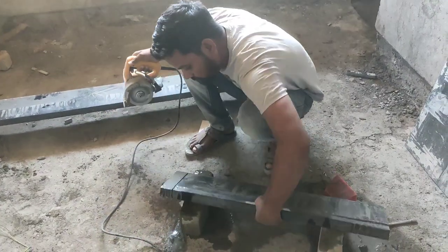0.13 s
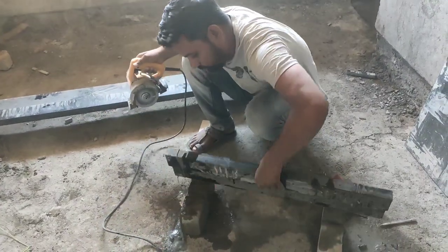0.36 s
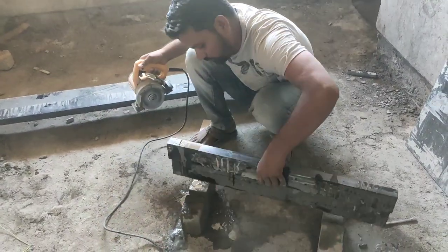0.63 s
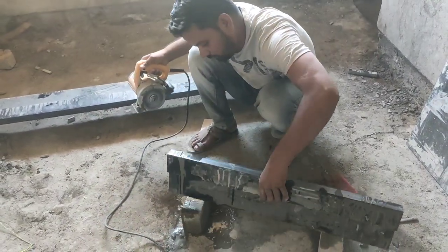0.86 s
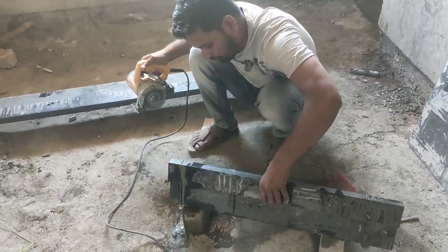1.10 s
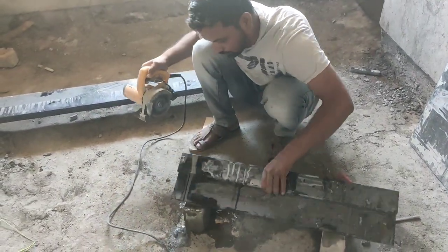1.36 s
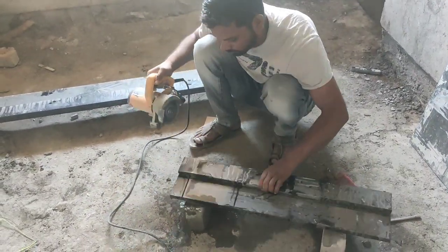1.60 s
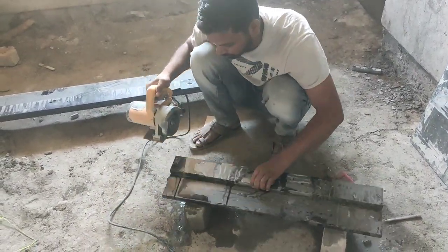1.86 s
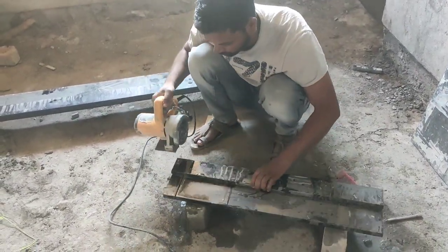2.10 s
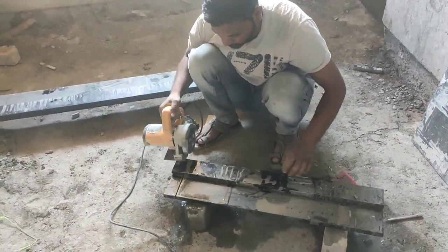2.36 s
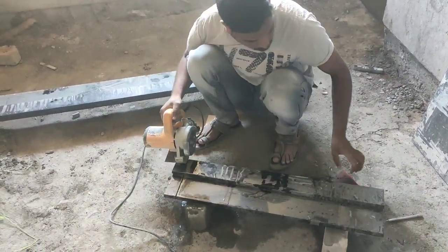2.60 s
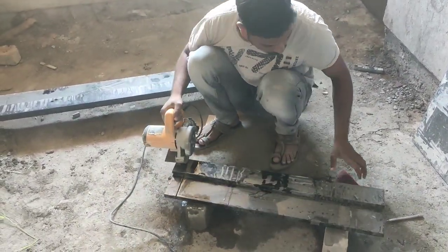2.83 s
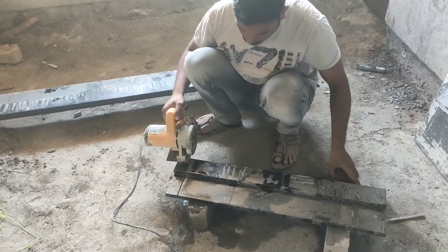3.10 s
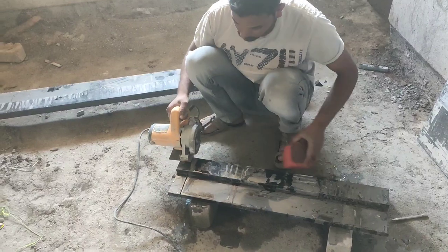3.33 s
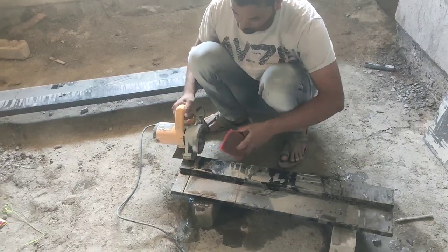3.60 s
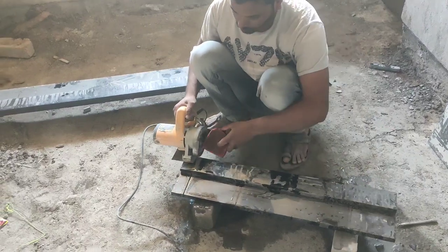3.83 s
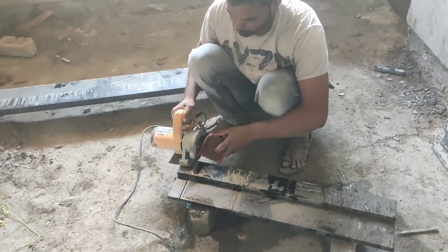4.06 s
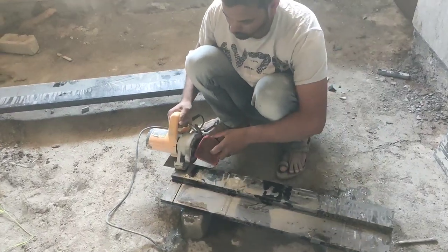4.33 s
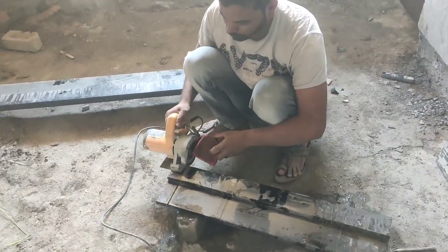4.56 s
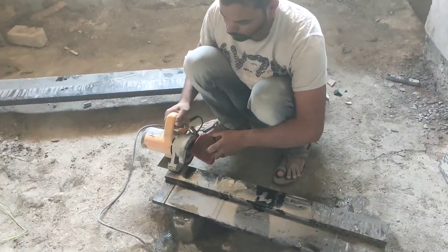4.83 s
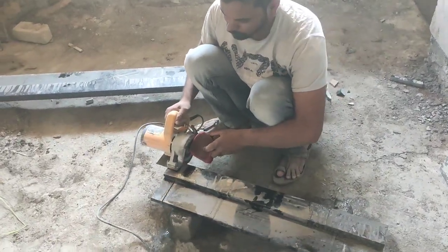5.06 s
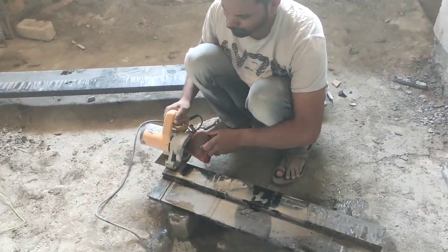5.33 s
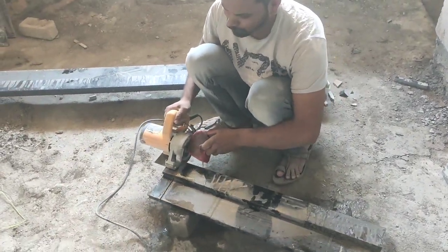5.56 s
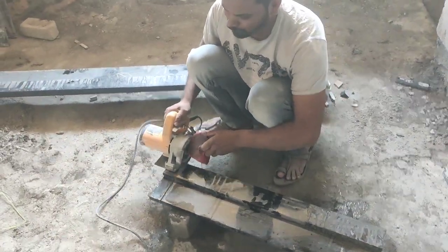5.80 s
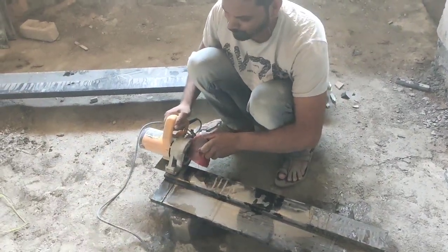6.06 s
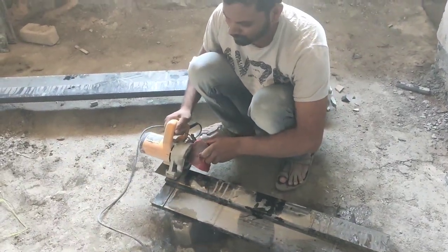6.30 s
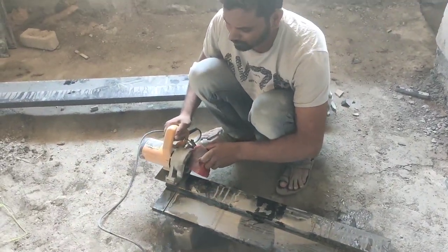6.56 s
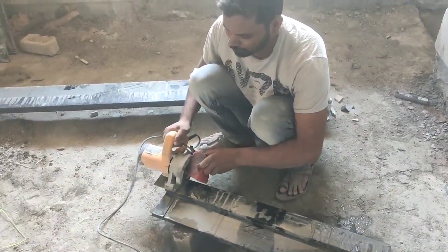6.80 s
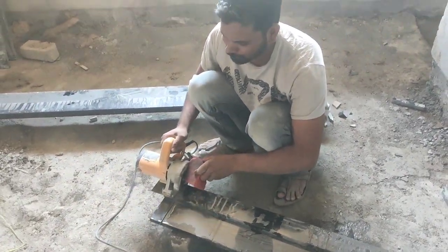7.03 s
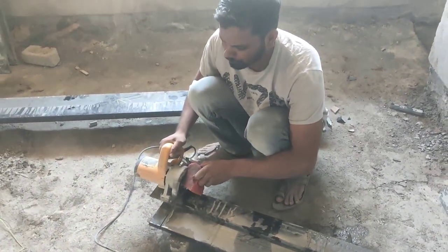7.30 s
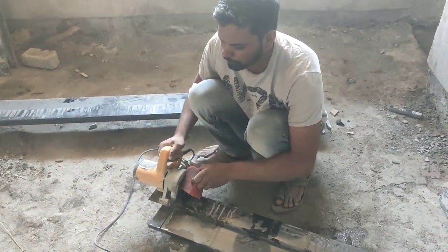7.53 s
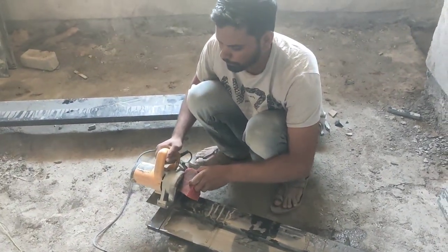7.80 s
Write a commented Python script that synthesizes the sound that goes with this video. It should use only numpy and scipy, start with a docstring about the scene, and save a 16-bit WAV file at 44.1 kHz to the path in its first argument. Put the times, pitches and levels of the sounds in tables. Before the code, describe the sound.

In a bare, hard-walled hall, a handheld electric cutter winds down, its airy roar and whine sinking while a stone slab is set down with soft knocks. Just before four seconds the switch clacks, the motor leaps to full speed, and the blade bites wet granite: a bright, gritty, ringing screech with hiss until the end. A phone listens a few steps away in stereo.

```python
"""Stone cutter in a bare hall

A handheld electric cutter coasts down, is switched on again and bites into wet granite.
The motor roars as noise coloured by its housing and whines in sines at multiples of the rotor speed.
Grains of grit ring the modes of the steel blade; rub and water spray hiss, blows knock, low bumps rumble.
A phone with two unlike microphones listens a few steps away.
"""
import sys
import numpy as np
from scipy import signal
from scipy.fft import rfft, irfft
from scipy.io import wavfile
from scipy.ndimage import uniform_filter1d

SR = 44100
rng = np.random.default_rng(int(sys.argv[2]) if len(sys.argv) > 2 else 0)


def int16_out(signal):
    """Quantize to a 16-bit WAV file."""
    q = np.round(np.clip(np.atleast_2d(signal).T, -1, 1) * 32767)
    wavfile.write(sys.argv[1], SR, q.astype(np.int16))


def volts_from_db(level):
    """Convert decibel levels to linear amplitude ratios."""
    exponent = np.asarray(level, float) / 20
    return 10 ** exponent


N = 348831
T = np.arange(N) / SR
HZ, FRAME_S = np.fft.rfftfreq(1024, 1 / SR), np.arange(N // 256 + 5) * 256 / SR  # grid of the hisses

SWITCH_S, FREE_HZ, RUN_UP_S = 3.76, 462, .17  # switched on, the rotor closes in on its free speed
START_HZ, FRICTION_HZ_PER_S, FAN_DRAG_S = 361, 19, 6.7  # coasting speed at 0 s and what slows it
GEAR = .43  # blade turns per rotor turn
TOUCH_S = 4.156  # the blade meets the stone

# The stone holds the rotor back: (t/s, loss of speed f/Hz)
STONE_LOAD = [(4.22, 0), (4.5, 41), (5.15, 46), (5.55, 36), (5.7, 39), (6.2, 34), (7.1, 40), (7.6, 26),
              (7.92, 24)]


def rotor(t):
    """Rotor speed in Hz: bearing friction brakes steadily, the fan more at speed; then run-up and load."""
    brake = FRICTION_HZ_PER_S * FAN_DRAG_S
    coast = (START_HZ + brake) * np.exp(-np.minimum(t, SWITCH_S) / FAN_DRAG_S) - brake
    run_up = 1 - np.exp(-np.maximum(t - SWITCH_S, 0) / RUN_UP_S)
    return coast + (FREE_HZ - coast) * run_up - curves(STONE_LOAD, t)[0]


# Roar spectrum at brightness 0: (f/Hz, relative level/dB per Hz)
DULL_ROAR = [(30, -52), (110, -33), (170, -21), (500, -13.5), (800, -10), (1300, -10), (1900, -6.5),
             (3000, -10), (4500, -17), (6200, -13), (7300, -23), (11500, -36.5), (16000, -33)]
# Roar spectrum at brightness 1: (f/Hz, relative level/dB per Hz)
BRIGHT_ROAR = [(18, -81), (30, -74), (233, -25), (303, -18), (486, -15), (822, -11), (962, -6.5),
               (1160, -8), (1320, -9), (1630, -8), (3310, 1.5), (4910, 5.5), (7470, -17.5), (11700, -20.5),
               (16000, -53)]
# Resonances of the casing, plainest while the roar is dull: (f/Hz, width f/Hz, lift before scaling level/dB)
CASING = [(780, 26, 12), (2100, 250, 4), (2620, 300, 3), (3950, 260, 8), (5650, 120, 3)]
# Roar under power, lower once the blade is in the stone: (t/s, level/dB, brightness 0-1)
POWERED_ROAR = [(3.763, -16, 0.8), (3.81, -15, 0.65), (3.95, -17, 0.42), (4.1, -14, 0.64),
                (4.44, -18, 0.54), (4.57, -22.5, 0.68), (5.75, -24, 0.65), (7.91, -23, 0.58)]
COAST_DB, COAST_DB_PER_OCTAVE = -19.5, 10.5  # coasting roar at START_HZ, without the afterglow
COAST_BRIGHT, COAST_BRIGHT_PER_OCTAVE = 0.45, 0.13  # brightness at START_HZ and its change with speed
AFTERGLOW_DB, AFTERGLOW_S = 1.5, 0.29  # louder roar from before the switch-off dies away in the hall
BASS_HZ, BASS_DB_PER_OCTAVE = 600, 2  # the bass fades faster as the rotor slows


def roar():
    """Fan air, gears and brushes: noise coloured by the casing, brighter at speed."""
    coasting = FRAME_S < SWITCH_S
    octaves = np.log2(rotor(FRAME_S) / START_HZ)
    coast_bright = COAST_BRIGHT + COAST_BRIGHT_PER_OCTAVE * octaves
    bright = np.clip(np.where(coasting, coast_bright, curves(POWERED_ROAR, FRAME_S)[1]), 0, 1.3)
    field_db = read(DULL_ROAR, HZ)[:, None] * (1 - bright) + read(BRIGHT_ROAR, HZ)[:, None] * bright
    bass_share = 1 / (1 + (HZ / BASS_HZ) ** 4)
    field_db += np.outer(bass_share, BASS_DB_PER_OCTAVE * (octaves + 0.51) * coasting)
    field_db += np.outer(lift(HZ, CASING), np.clip(1.5 - 2.2 * bright, 0, 1.1))
    air = hiss(field_db, patchy_db=1.5, flicker_db=.6, size=(3, 20))
    coast_db = COAST_DB + COAST_DB_PER_OCTAVE * np.log2(rotor(T) / START_HZ)
    coast_db += AFTERGLOW_DB * np.exp(-T / AFTERGLOW_S)
    return volts_from_db(np.where(T < POWERED_ROAR[0][0], coast_db, curves(POWERED_ROAR)[0])) * air


# Resonances that the coasting whine flares on in passing: (f/Hz, width f/Hz, lift level/dB)
FLARES = [(4150, 500, 6), (2640, 300, 11)]
# Whine under power: (t/s, level/dB before its trembling)
POWERED_WHINE = [(3.8, -44), (3.94, -32), (4.0, -22), (4.22, -23), (4.45, -25), (4.6, -32), (5.4, -23.5),
                 (6.6, -25), (6.95, -32), (7.92, -31)]
# Low resonances of the hall that lift the unbalance: (f/Hz, width f/Hz, lift level/dB)
HALL_RESONANCES = [(160, 7, 16), (224, 16, 19), (260, 10, 18), (316, 22, 23), (425, 8, 18)]
WHINE_DB, WHINE_DB_PER_OCTAVE = -44, 10  # coasting whine at START_HZ off the flares; fades with speed
OVERTONES, OVERTONE_DB = (24, 36), -47  # multiples of the rotor speed; level at the casing resonance
BELL_HZ, BELL_WIDTH_HZ = 5650, 500  # casing resonance that lets the overtones out
WOBBLE_DB = -76  # unbalance at the rotor speed itself, before the hall lifts it
BUZZ_DB, BUZZ_HZ, BUZZ_HOLD_S, BUZZ_FALL_DB_PER_S = -45, 300, .26, 85  # held, then falling
SPINDLE_DB, SPINDLE_SWELL_DB = -58, 3  # relative level of the spindle beat and its slow swell


def whine():
    """Sines locked to the rotor: slots at twelve times, overtones, unbalance; buzz and spindle beat."""
    hz, on = rotor(T), T - SWITCH_S
    # the speed and the strength tremble a little
    turns = 2 * np.pi * np.cumsum(hz * (1 + 0.00231 * wander(span=700))) / SR
    coast_db = WHINE_DB + WHINE_DB_PER_OCTAVE * np.log2(hz / START_HZ) + lift(12 * hz, FLARES)
    slots = volts_from_db(np.where(on < 0, coast_db, curves(POWERED_WHINE)[0])) * np.sin(12 * turns)
    for k in OVERTONES:
        bell = 1 / (1 + (2 * (k * hz - BELL_HZ) / BELL_WIDTH_HZ) ** 2)
        slots += volts_from_db(OVERTONE_DB) * bell * np.sin(k * turns)
    slots *= np.sqrt(2) * volts_from_db(2.5 * wander(span=1200))
    low = volts_from_db(WOBBLE_DB + lift(hz, HALL_RESONANCES) + 2.5 * wander(span=3000)) * np.sin(turns)
    # mains buzz of the field coils under the starting current
    buzz_db = BUZZ_DB - BUZZ_FALL_DB_PER_S * np.maximum(on - BUZZ_HOLD_S, 0) + 3.1 * wander(span=600)
    low += np.clip(on / .02, 0, 1) * volts_from_db(buzz_db) * np.sin(2 * np.pi * BUZZ_HZ * T)
    # the blade spindle beats in the cut, at its turning rate and twice that
    beat = sum(resonate(rng.standard_normal(N), k * GEAR * hz, 22) for k in (1, 2))
    in_cut = np.clip((T - TOUCH_S) / 0.045, 0, 1)
    low += in_cut * volts_from_db(SPINDLE_DB + SPINDLE_SWELL_DB * wander(span=9000)) * beat
    return hall(slots, t60=.3, wet_db=-9, lag_count=1) + np.sqrt(2) * low


# Blade modes, shifting as the stone grips more of the rim:
# (shallow f/Hz, shallow relative level/dB, deep f/Hz, deep relative level/dB, width f/Hz)
BLADE_MODES = [(1970, -17, 1900, -28, 90), (2500, -22, 2580, -15, 70), (3090, -18, 2770, -13, 80),
               (2900, -22, 2960, -16, 70), (3400, -20, 3360, -12, 90), (3875, -2.5, 4000, -12, 90),
               (4310, -8, 4250, -11, 140), (4950, -5, 4720, -12, 130), (5190, -4, 5250, -9, 160),
               (6720, -12, 6600, -13, 140), (7070, -12, 7050, -18, 120), (8130, -14, 8240, -13, 240),
               (8510, -20, 8500, -23, 200), (9510, -25, 9580, -24, 250), (10150, -16, 10300, -16, 170),
               (11800, -26, 12000, -25, 280), (12400, -25, 12650, -24, 450), (13800, -28, 13900, -26, 400)]
# Depth of the cut: (t/s, depth 0-1)
CUT_DEPTH = [(4.3, 0), (4.9, .1), (5.3, .75), (6.3, .9), (7.92, 1)]
# The higher mode that sings out: (t/s, f/Hz, level/dB before the push)
SCREECH_MODE = [(4.24, 6490, -20.5), (4.4, 6290, -21), (4.7, 6290, -21), (4.95, 6150, -23.5),
                (5.7, 6360, -19), (6.4, 6265, -23.5), (7.0, 6266, -22), (7.91, 6290, -24.5)]
# The lower mode that sings out: (t/s, f/Hz, level/dB before the push)
GROAN_MODE = [(5.55, 2250, -34), (5.85, 2410, -32), (6.2, 2370, -27), (6.45, 2355, -31), (6.6, 2350, -27),
              (6.95, 2320, -29), (7.1, 2300, -37), (7.35, 2270, -29), (7.91, 2245, -30)]
# The hand pushes harder (+) or eases off (-): (t/s, change of level/dB, length t/s)
HAND_PUSHES = [(4.278, 1, .06), (4.36, -3, 0.088), (4.445, 2, 0.04), (4.597, -6, 0.068),
               (4.675, 0.5, 0.072), (4.83, -3, 0.044), (5.743, 2, 0.16), (5.816, -3.5, 0.05),
               (6.246, 1, 0.21), (6.363, -5, .08), (6.56, 2, 0.081), (6.79, 0, .05), (7.26, -0.5, 0.04)]
# Spectrum of the rub: (f/Hz, relative level/dB per Hz)
RUB_SPECTRUM = [(500, -62), (1500, -42), (2100, -8.5), (2500, -9.5), (2900, -29), (3150, -25), (3500, -3),
                (4000, 0), (5000, -3.5), (5650, -1.5), (6300, 0), (7400, -13.5), (9000, -51)]
# Spectrum of the water spray: (f/Hz, relative level/dB per Hz)
SPRAY_SPECTRUM = [(4000, -60), (6500, 16), (7500, 10), (8250, 4.5), (9050, 7), (10300, 5), (12500, 7.5),
                  (13400, -4), (15500, 9), (16000, -38)]
# Spray hiss: (t/s, level/dB before the push)
SPRAY_HISS = [(4.2, -19), (4.5, -34), (5.2, -31), (6.05, -27), (6.5, -27.5), (7.3, -28), (7.7, -26),
              (7.91, -30)]
TOUCH_RISE_S, GRIT_DB = 0.33, -14.5  # fade-in at the touch; base level that ring and rub follow
RING_DB, RUB_DB = -2.5, -4.5  # blade ring and rub against the grit level
SPRAY_SHARE, SCREECH_SHARE = 1.2, 1.7  # how strongly each follows the push


def grinding():
    """Dense grains of uneven size strike the blade; the rub and the water spray hiss around it."""
    push_db = sum(db * np.exp(-(2 * (T - s) / length) ** 2) for s, db, length in HAND_PUSHES)
    grit_db = GRIT_DB + push_db
    spray_db = curves(SPRAY_HISS)[0] + SPRAY_SHARE * push_db
    depth, touch = curves(CUT_DEPTH)[0], np.clip((T - TOUCH_S) / TOUCH_RISE_S, 0, 1)
    grains = rng.standard_normal(N) * volts_from_db(1.6 * wander(span=120) + 1.0 * wander(span=1500))
    waver = 1 + .004 * wander(span=5000)  # all blade modes waver slowly together in pitch, by chance
    modes = np.zeros(N)
    for hz0, db0, hz1, db1, width in BLADE_MODES:
        mode_db = db0 + (db1 - db0) * depth + 1.5 * wander(span=4000)
        modes += volts_from_db(mode_db) * resonate(grains, waver * (hz0 + (hz1 - hz0) * depth), width)
    ring = touch * volts_from_db(grit_db + RING_DB) * evened(modes)
    for rows, width, share in ((SCREECH_MODE, 130, SCREECH_SHARE), (GROAN_MODE, 70, 1)):
        hz, db = curves(rows)
        fade_in = np.clip((T - rows[0][0]) / 0.034, 0, 1)
        ring += volts_from_db(db + share * push_db) * fade_in * resonate(grains, waver * hz, width)
    steady = np.ones(len(FRAME_S))
    # the many lesser modes of disc and slab: narrow bands that swell and die over a few tenths of a second
    rub_field = np.outer(read(RUB_SPECTRUM, HZ), steady)
    rub = volts_from_db(grit_db + RUB_DB) * hiss(rub_field, patchy_db=4.2, flicker_db=1.0, size=(2, 90))
    spray_field = np.outer(read(SPRAY_SPECTRUM, HZ), steady)
    spray = volts_from_db(spray_db) * hiss(spray_field, patchy_db=3.5, flicker_db=1.2, size=(3, 50))
    return hall(ring, t60=.3, wet_db=1.5) + touch * (rub + spray)


# Stone set down and the jolt of the switch: (t/s, relative level/dB, thud f/Hz, decay by 60 dB t/s)
BLOWS = [(.05, -19.5, 656, 0.15), (.527, -30, 325, 0.15), (1.063, -32, 552, 0.19), (1.13, -26, 353, 0.041),
         (1.72, -33, 673, 0.17), (2.12, -26, 589, .15), (3.763, -14, 5620, 0.069),
         (3.79, -10.5, 2780, 0.088)]


def knocks():
    """Each blow is a short dying tone with a close partner and a puff of noise."""
    out, t = np.zeros(N), T[:12000]
    for s, db, hz, t60 in BLOWS:
        tone = np.sin(2 * np.pi * hz * t) + 0.51 * np.sin(2 * np.pi * 1.12 * hz * t)
        puff = 0.53 * rng.standard_normal(len(t)) * volts_from_db(-60 * t / 0.035)
        attack = np.minimum(t / 0.0019, 1)
        out[round(s * SR):][:len(t)] += volts_from_db(db - 60 * t / t60) * (tone + puff) * attack
    out = signal.sosfilt(signal.butter(2, 200, "high", fs=SR, output="sos"), out)
    return hall(out, t60=0.45, wet_db=-5.5)


# Low bumps, nearly all in the right microphone: (t/s, level/dB before the microphone gains, length t/s)
LOW_BUMPS = [(.2, -54, .3), (.7, -54, .4), (1.15, -55, .15), (4.52, -52, .05), (5.38, -42, .04),
             (5.45, -35, .05), (5.55, -48, .1), (5.73, -33, .04), (5.79, -40, .05), (5.88, -48, .1),
             (6.1, -48, .05)]
DRAUGHT_DB = -73  # steady rumble under the bumps, before the microphone gains


def bumps():
    """Lumpy rumble, mostly under 100 Hz, as from a draught or the holding hand."""
    noise = uniform_filter1d(rng.standard_normal(N), size=60)
    lumps = evened(signal.sosfilt(signal.butter(1, 45, fs=SR, output="sos"), noise))
    swell = volts_from_db(DRAUGHT_DB) + sum(volts_from_db(db) * np.exp(-(2 * (T - s) / length) ** 2)
                                  for s, db, length in LOW_BUMPS)
    return np.outer([.1, 1.9], swell * lumps)  # left and right gain


def evened(x):
    """Scales to rms 1."""
    return x / np.sqrt(np.mean(x ** 2) + 1e-20)


def read(points, hz):
    """A spectrum table read on a log-frequency axis."""
    f, value = np.transpose(points)
    return np.interp(np.log(hz + 1), np.log(f + 1), value)


def curves(rows, t=T):
    """The columns of a table read at the times t."""
    s, *columns = np.transpose(rows)
    return [np.interp(t, s, c) for c in columns]


def lift(hz, peaks):
    """Gain in dB of a few broad resonances at the frequencies hz."""
    return 10 * np.log10(1 + sum((volts_from_db(db) ** 2 - 1) / (1 + (2 * (hz - f) / width) ** 2)
                                 for f, width, db in peaks))


def resonate(x, hz, width):
    """Shifts the curve hz down to zero, smooths twice for steep skirts and shifts back; rms 1."""
    turn, r = np.exp(2j * np.pi * np.cumsum(hz) / SR), np.exp(-np.pi * width / SR)
    smooth = signal.lfilter([(1 - r) ** 2], [1, -2 * r, r ** 2], x / turn)
    return evened((turn * smooth).real)


def wander(span):
    """Slow chance of rms 1 that changes over span samples."""
    return evened(uniform_filter1d(uniform_filter1d(rng.standard_normal(N), span), span))


# Left-right likeness of every hiss: (f/Hz, correlation -1 to 1)
LIKENESS = [(60, 0.45), (180, 1), (550, 0.75), (1650, -0.09), (4970, -0.054), (15000, 0.12)]


def hiss(field_db, patchy_db, flicker_db, size=(12, 8)):
    """Noise of rms 1 in two channels from random short-time spectra, in patches of size (bins, frames)."""
    a, b, c, d, patches = rng.standard_normal((len(FRAME_S), 513, 5)).T
    patches = uniform_filter1d(patches, size=size[0], axis=0)
    patches = evened(uniform_filter1d(patches, size=size[1], axis=1))
    flicker = evened(uniform_filter1d(rng.standard_normal(len(FRAME_S)), size=3))
    same, left = np.clip(read(LIKENESS, HZ), -1, 1)[:, None], a + 1j * b
    right = same * left + np.sqrt(1 - same ** 2) * (c + 1j * d)
    # every frame gets the same power before patches and flicker
    shape = volts_from_db(field_db) / np.sqrt(np.mean(volts_from_db(field_db) ** 2, axis=0))
    z = np.array([left, right]) * shape * volts_from_db(patchy_db * patches + flicker_db * flicker)
    return evened(signal.istft(z, nperseg=1024, noverlap=768)[1][:, :N])


def hall(x, t60, wet_db, lag_count=15):
    """The direct sound, earlier on the right, plus a tail of sparse taps that differ by microphone."""
    signs = rng.choice([-1., 1.], (2, 16000))
    taps = signs * (rng.random((2, 16000)) < .06) * volts_from_db(-60 * T[:16000] / t60)
    taps[:, :150] = 0  # a gap before the tail
    taps *= volts_from_db(wet_db) / np.linalg.norm(taps[0])
    taps[0, lag_count] = taps[1, 0] = 1
    return signal.oaconvolve(x[None], taps / np.linalg.norm(taps[0]), axes=1)[:, :N]


def lean(x, points):
    """Shares the level between the microphones by frequency."""
    db = read(points, np.fft.rfftfreq(N, 1 / SR)) / 2
    return irfft(rfft(x) * volts_from_db(np.array([db, -db])), N)


# How motor and knocks lean to one microphone: (f/Hz, left minus right level/dB)
MOTOR_LEAN = [(60, 22), (110, 7), (200, 1), (380, 1), (700, 0.5), (1290, 1), (2380, 5), (4400, 7),
              (8120, -3.5), (15000, -8)]
# How the grinding leans to one microphone: (f/Hz, left minus right level/dB)
BLADE_LEAN = [(1500, 16), (2400, 5.5), (4000, 7), (5200, 11), (6300, 0), (8000, -1), (15000, -8)]
# The tool turns in the hand: (t/s, added left minus right level/dB)
TOOL_TURN = [(0, 0), (3.5, -1), (4, -1.5), (5, -5), (7.92, -5)]


def scene():
    """Motor, blade and stone as the two microphones meet them."""
    turn_db = curves(TOOL_TURN)[0] / 2
    tool = lean(roar() + whine() + knocks(), MOTOR_LEAN) + lean(grinding(), BLADE_LEAN)
    return tool * volts_from_db(np.array([turn_db, -turn_db])) + bumps()


def band_limit(x):
    """A steep low-pass at the top of the band."""
    return signal.sosfilt(signal.butter(12, 16230, fs=SR, output="sos"), x)


def record(dry):
    """Loud treble shakes the right microphone, its envelope beating as low noise; peaks round off."""
    # the squared signal holds the beat of the envelope
    shaken = signal.sosfilt(signal.butter(2, [160, 2500], "band", fs=SR, output="sos"), dry[1] ** 2)
    wet = dry + np.outer([0, volts_from_db(-2.0)], shaken)
    over = np.maximum(abs(wet) - .55, 0)
    wet -= np.sign(wet) * (over - .4 * np.tanh(over / .4))
    low_pass = signal.firwin(511, 16150, window=("kaiser", 9), fs=SR)
    wet = signal.oaconvolve(wet, low_pass[None], "same")
    return band_limit(wet)


dry = scene()
out = record(dry)
int16_out(out)
```